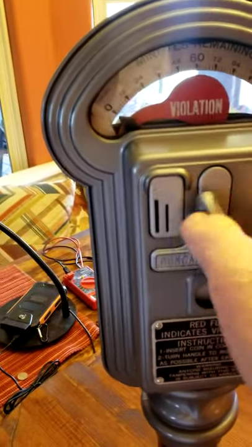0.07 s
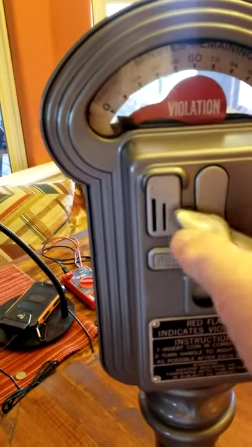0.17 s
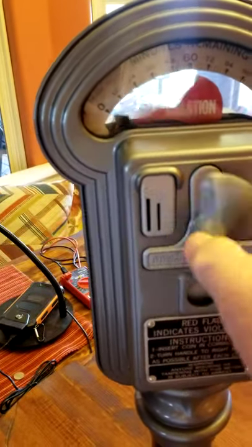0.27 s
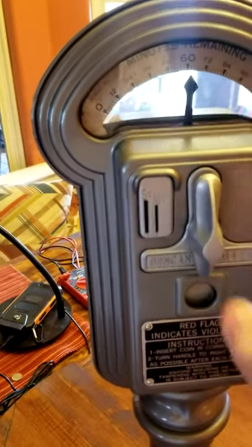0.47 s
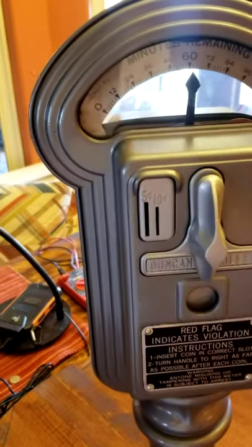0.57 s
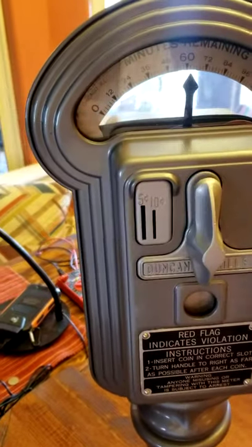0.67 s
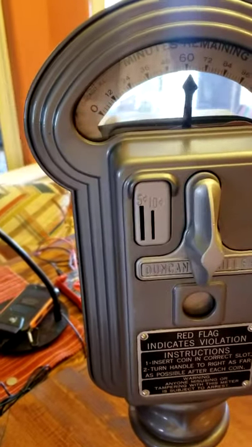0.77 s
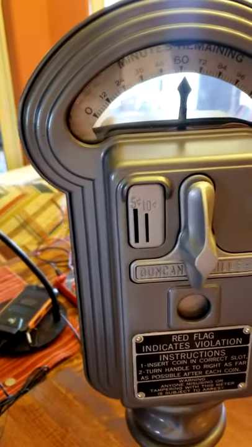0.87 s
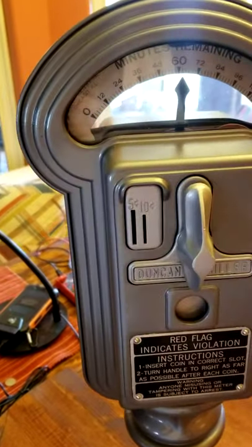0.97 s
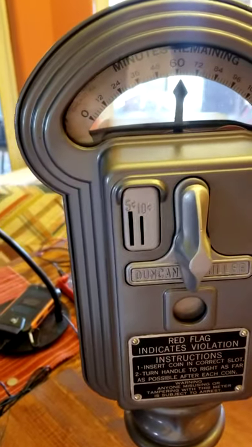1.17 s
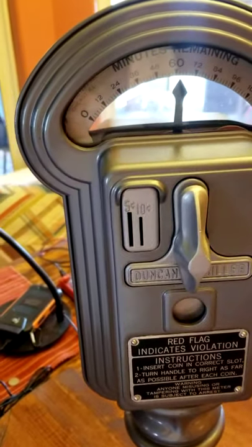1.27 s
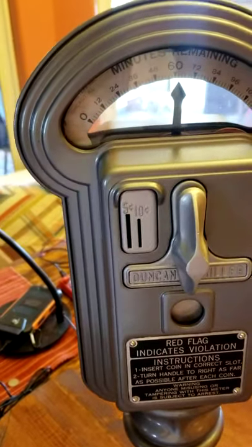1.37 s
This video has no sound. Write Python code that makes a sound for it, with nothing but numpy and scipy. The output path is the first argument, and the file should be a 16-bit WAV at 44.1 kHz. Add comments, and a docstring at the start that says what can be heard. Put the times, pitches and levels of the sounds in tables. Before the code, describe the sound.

A parking meter handle is released, whirring back and hitting its stop with a sharp clack.

```python
"""A ratchet's last faint ticks, then the handle of a metal parking meter is let go in a quiet room.
A catch snaps free, the spring whirls the gears back, and the handle slams on its stop and bounces.
The cast case rings, the stand shudders, the room answers; a few faint handling sounds follow.
Contacts are bursts of shaped noise; ringing parts are sums of decaying modes."""
import sys
import numpy as np
from scipy import signal
from scipy.fft import rfft, irfft, next_fast_len
from scipy.io import wavfile
from scipy.ndimage import map_coordinates

SR = 44100
rng = np.random.default_rng(int(sys.argv[2]) if len(sys.argv) > 2 else 0)


def int16_out(signal):
    """Quantize to a 16-bit WAV file."""
    q = np.round(np.clip(np.atleast_2d(signal).T, -1, 1) * 32767)
    wavfile.write(sys.argv[1], SR, q.astype(np.int16))


N = 61739
ATTACK_S = 0.00034

# left-right likeness of near, diffuse and background sound: freq_hz, correlation
NEAR_ALIKE = [(170, 0.98), (400, .6), (700, 0), (2000, .1), (6000, 0.51), (12000, 0.22)]
ROOM_ALIKE = [(170, 1), (400, .4), (900, 0), (12000, 0)]
FLOOR_ALIKE = [(120, .98), (400, .75), (1500, .3), (10000, .1)]


def amp(db):
    """Decibels to gain."""
    return 10 ** (np.asarray(db) / 20)


def unit(x):
    """Scale to rms 1."""
    return x / np.sqrt(np.mean(x ** 2) + 1e-20)


def along(points, hz):
    """Interpolate (freq_hz, value) points on a log axis."""
    freqs_hz, values = np.transpose(points)
    return np.interp(np.log(hz + 1), np.log(freqs_hz + 1), values)


def pan(db):
    """Stereo gains; positive is left."""
    return amp(np.array([[db], [-db]]) / 2)


def filtered(x, response):
    """Apply the gain response(hz)."""
    size = next_fast_len(N + SR // 2)
    return irfft(rfft(x, size) * response(np.fft.rfftfreq(size, 1 / SR)), size)[..., :N]


def noise(colour_db, alike):
    """Stereo noise, rms 1, of given spectrum and left-right likeness."""
    def mid_side_gains(hz):
        angle = np.arccos(np.clip(along(alike, hz), -1, 1)) / 2
        return amp(colour_db(hz)) * [np.cos(angle), np.sin(angle)]
    mid, side = filtered(rng.standard_normal((2, N)), mid_side_gains)
    return unit(np.array([mid + side, mid - side]))


def struck(start_s, rise_s, t60_s):
    """Envelope of a blow."""
    t = np.maximum(np.arange(N) / SR - start_s, 0)
    return (1 - np.exp(-t / rise_s)) * amp(-60 * np.minimum(t / t60_s, 10))


def wobble(knots_per_s):
    """Smooth random curve, 0.5 s long."""
    return map_coordinates(rng.standard_normal(400), [np.arange(SR // 2) * knots_per_s / SR], mode="wrap")


def ring(modes, start_s, rise_s, spread, drift_rad, delay_cycles=0):
    """Decaying modes with drifting phase; spread scales the left-right phase offset."""
    t = np.arange(SR // 2) / SR
    attack = 1 - np.exp(-t / rise_s)
    out = np.zeros((2, N + SR))
    for hz, db, t60_s in modes:
        scatter_db, lag = rng.standard_normal(2)
        phase = rng.uniform(0, 2 * np.pi) + drift_rad * wobble(knots_per_s=66)
        offset = np.array([[1], [-1]]) * lag * spread * min(hz / 1000, 1)
        envelope = attack * amp(db + scatter_db - 60 * t / t60_s)
        start = round((start_s + delay_cycles / hz) * SR)
        out[:, start:][:, :len(t)] += envelope * np.sin(2 * np.pi * hz * t + phase + offset)
    return out[:, :N]


def resonant(contacts, alike):
    """Brief contacts, each one resonant band of noise."""
    out = np.zeros((2, N))
    for start_s, db, centre_hz, halfwidth_oct, rise_s, t60_s in contacts:
        band_db = lambda hz: -20 * np.log10(1 + (np.log2((hz + 1) / centre_hz) / halfwidth_oct) ** 2)
        out += amp(db) * struck(start_s, rise_s, t60_s) * noise(band_db, alike)
    return out


def room_tone():
    """Low rumble, stronger on the right, and faint hiss."""
    # background spectrum: freq_hz, density_db
    colour = [(15, -36), (25, -6), (69, 0), (160, -11.5), (227, -9), (399, -14.5), (648, -31), (2420, -31),
              (3260, -35), (4260, -33), (6380, -30.5), (7700, -48), (9050, -44.5), (12200, -25.5),
              (15500, -27.5)]
    # background balance: freq_hz, pan_db
    balance = [(60, -10), (300, 2), (1000, 0.5), (12000, 0.5)]
    tone = amp(-66.5) * noise(lambda hz: along(colour, hz), FLOOR_ALIKE)
    return filtered(tone, lambda hz: amp(np.array([[.5], [-.5]]) * along(balance, hz)))


def windup():
    """The ratchet ticks its last; the rattle of winding dies away."""
    # rattle spectrum: freq_hz, density_db
    colour = [(100, -5), (620, -9.5), (870, -0.5), (1150, -9), (1550, 0.5), (3200, -8.5), (4500, -4),
              (6600, -6), (7800, -19.5), (11000, -11.5), (13200, -8), (15700, -17), (16500, -40)]
    # ratchet ticks: start_s, level_db
    clicks = [(.002, -51.5), (.032, -45), (.059, -50), (0.228, -60)]
    # ratchet modes: pitch_hz, level_db, t60_s
    modes = [(865, -5.5, 0.1), (1450, -4.5, .07), (1546, -0.5, 0.14), (1667, -1.5, 0.085), (2350, -4, .06),
             (4350, -1.5, .11), (5283, -10, .08), (6600, -10, .08)]
    decay_db_per_s = 146
    fade = amp(-43 - decay_db_per_s * np.arange(N) / SR)
    rattle = fade * noise(lambda hz: along(colour, hz), ROOM_ALIKE)
    ticks = sum(amp(db) * ring(modes, start_s, rise_s=.00056, spread=1, drift_rad=.27)
                for start_s, db in clicks)
    return pan(db=3.5) * (rattle + ticks)


def handling():
    """Faint knocks and rubs before and after the release."""
    # contacts: start_s, level_db, centre_hz, halfwidth_oct, rise_s, t60_s
    touches = [(.085, -61, 330, .4, .025, .6), (.196, -68, 4800, .5, .004, .2),
               (.996, -66, 2330, .04, .003, .21), (.997, -62, 290, .35, .012, .42),
               (.996, -73, 1150, .12, .003, .2), (1.232, -70, 700, .3, .008, .38),
               (1.272, -68, 1120, .1, .012, .2), (1.25, -75, 3500, .9, .025, .3)]
    return pan(db=-.5) * resonant(touches, FLOOR_ALIKE)


def gears():
    """Teeth tick past unevenly as the spring unwinds."""
    # run-back envelope: time_s, level_db
    run = [(.232, -67.5), (.243, -29), (.262, -28.5), (.28, -27.5), (.295, -31), (.32, -38), (.345, -36.5),
           (.37, -38.5), (.392, -40.5), (.41, -71)]
    # gear spectrum: freq_hz, density_db
    colour = [(60, -32), (130, -19), (200, -7), (660, -7), (830, 7.5), (960, -1), (1100, 3), (1300, -5),
              (2100, -0.5), (3800, -8.5), (6500, -7), (8800, -16.5), (10500, -9), (12700, -1.5),
              (14400, -9.5), (15300, -7), (15900, -30)]
    teeth, teeth_per_s, scatter_db = 200, 330, 3
    run_s, run_db = np.transpose(run)
    t = np.arange(N) / SR
    jitter, strength = rng.standard_normal((teeth, 2)).T
    tooth_s = run_s[0] + (np.arange(teeth) + .3 * jitter) / teeth_per_s
    ticks = np.bincount(np.clip(tooth_s * SR, 0, N - 1).astype(int), amp(scatter_db * strength), N)
    chatter = signal.fftconvolve(ticks, struck(0, ATTACK_S, t60_s=.025))[:N] * (t < run_s[-1])
    running = (t > run_s[0]) & (t < run_s[-1])
    chatter /= np.sqrt(np.mean(chatter[running] ** 2))
    envelope = amp(np.interp(t, run_s, run_db)) * chatter
    return pan(db=4) * envelope * noise(lambda hz: along(colour, hz), NEAR_ALIKE)


def catch():
    """Catch and pawl snap: bright cracks that ring the small steel parts."""
    # snaps: start_s, level_db, pan_db
    snaps = [(0.2385, -8, 5), (0.272, -15.5, 3.5), (.277, -19, 3.5), (.2995, -24.5, 7), (.3425, -28.5, 8.5),
             (.3518, -27, 2), (.357, -27, 3.5)]
    # snap spectrum: freq_hz, density_db
    colour = [(200, -37.5), (800, -21), (2900, -13), (3800, -16), (6200, -18.5), (7300, -6), (8600, -19.5),
              (10200, -7), (11400, -14.5), (12200, -2), (13700, 2.5), (14500, -9), (15300, -8.5),
              (16800, -22.5)]
    # steel modes: pitch_hz, level_db, t60_s
    modes = [(12130, 0, .2), (12630, -2, .19), (13750, -2, .17), (15275, -4, .18)]
    out = np.zeros((2, N))
    for start_s, db, pan_db in snaps:
        crack = noise(lambda hz: along(colour, hz), NEAR_ALIKE) * struck(start_s, ATTACK_S, t60_s=.02)
        steel = amp(-23) * ring(modes, start_s, rise_s=.001, spread=.65, drift_rad=1)
        out += amp(db) * (pan(pan_db) * crack + pan(db=3.6) * steel)
    return out


def stops():
    """Handle and levers hit their stops: a crack, a hollow knock, a quieter ring of the case."""
    # blows: start_s, level_db, tilt_db_per_oct, pan_db
    blows = [(0.2398, -24, -3.5, 7), (0.2669, -22.5, -0.5, 4), (0.3027, -20, -5.5, 3),
             (0.3374, -26, -6, 4.5), (.394, -4.5, -1, 2.5), (0.4077, -21.5, 1.5, 5),
             (0.4289, -14.5, -2.5, 0), (0.4665, -23, -4.5, 6), (.5005, -32.5, -5, 10),
             (1.131, -67, -1.5, 6)]
    # crack spectrum: freq_hz, density_db
    colour = [(60, -27.5), (200, -15.5), (600, -17.5), (770, -4.5), (1450, -4), (2000, -4.5), (2500, -5.5),
              (3250, -4), (3650, -14), (4000, -5.5), (5300, -8), (6300, -11.5), (7000, -9.5), (8000, -17.5),
              (10500, -7.5), (13500, -5), (14700, -11), (15600, -9), (16500, -25.5)]
    # case modes: pitch_hz, level_db, t60_s
    modes = [(178, -7, .25), (232, -13, .28), (322, -13, .35), (436, -7, .18), (730, -3, .12), (803, 1, .1),
             (904, -5, .43), (992, -8, .28), (1040, -1, .11), (1337, 0, .15), (1420, 0, .09),
             (1610, -1, .08), (1765, -2, .17), (2318, -1, .09), (3126, -6, .08), (3833, -7, .15),
             (3965, -2, .08), (4440, -5, .08), (4935, -4, .11), (5305, -5, .09), (10950, -9, .16)]
    knock_t60_s = .032  # damped by the contact
    damped = [(hz, db, knock_t60_s) for hz, db, _ in modes]
    out = np.zeros((2, N))
    for start_s, db, tilt_db_per_oct, pan_db in blows:
        tilted_db = lambda hz: along(colour, hz) + tilt_db_per_oct * np.log2(1 + hz / 1500)
        crack = noise(tilted_db, NEAR_ALIKE) * struck(start_s, ATTACK_S, t60_s=.021)
        # low modes arrive later
        knock = ring(damped, start_s, rise_s=.00057, spread=.79, drift_rad=1, delay_cycles=1.6)
        tail = ring(modes, start_s, rise_s=.003, spread=.8, drift_rad=1, delay_cycles=1.6)
        out += amp(db) * pan(pan_db) * (crack + amp(-16.5) * knock + amp(-25.5) * tail)
    return out


def levers():
    """Loose levers ping and knock in passing."""
    # pings: start_s, level_db, centre_hz, halfwidth_oct, rise_s, t60_s
    pings = [(.247, -31, 495, .08, .004, .13), (.283, -30, 850, .06, .004, .12),
             (.334, -27, 2230, .06, .003, .05), (.407, -24, 5000, .025, .003, .04)]
    return pan(db=5) * resonant(pings, NEAR_ALIKE)


def stand():
    """The meter shudders on its stand as the spring lets go and stops."""
    # jolts: start_s, level_db
    jolts = [(.251, -28), (.394, -36.5), (.552, -50.5)]
    # stand modes: pitch_hz, level_db, t60_s
    modes = [(47.7, -6.5, 0.49), (83, -1.5, 0.39), (96, -9.5, 0.44), (227.6, -7.5, 0.37), (322, -11.5, .3),
             (486.5, -1.5, .22)]
    return sum(amp(db) * ring(modes, start_s, rise_s=.014, spread=.13, drift_rad=.083)
               for start_s, db in jolts)


def reverb(x, decay, delay_s):
    """Diffuse tail, fed equally on both sides; decay sets t60 by frequency."""
    # tail spectrum: freq_hz, density_db
    colour = [(100, -8), (300, 1.5), (1000, -4), (5000, -1), (9000, 1.5), (13000, -6), (15500, -4.5),
              (16200, -28)]
    diffuse = noise(lambda hz: along(colour, hz), ROOM_ALIKE)
    hz, t, spectra = signal.stft(diffuse, SR, nperseg=256)
    tail = signal.istft(spectra * amp(-60 * t / along(decay, hz)[:, None]), SR, nperseg=256)[1]
    tail /= np.linalg.norm(tail[0])
    delayed = np.pad(tail, ((0, 0), (round(delay_s * SR), 0)))
    centred = np.sqrt(np.mean(x ** 2)) * np.array([unit(side) for side in x])
    return signal.fftconvolve(centred, delayed, axes=1)[:, :N]


def room(parts):
    """The near room answers each part; the far room rings longer and softer."""
    # near and far decay: freq_hz, t60_s
    near_decay = [(100, 0.36), (400, 0.26), (1000, .33), (5000, 0.29), (8000, 0.092), (14000, .22)]
    far_decay = [(100, 1), (1000, .62), (5000, 0.66), (9000, .55), (14000, 0.29)]
    near = sum(reverb(part, near_decay, delay_s=.007) for part in parts)
    far = reverb(sum(parts), far_decay, delay_s=.02)
    return amp(-8) * pan(db=1.5) * near + amp(-18.5) * pan(db=2) * far


def scene():
    """The mechanism and its reverb, with the quieter sounds, over room tone."""
    mechanism = [catch(), gears() + levers(), stops()]
    return sum(mechanism) + room(mechanism) + handling() + stand() + windup() + room_tone()


def record(dry):
    """Soft peak limit, then a brick-wall low-pass."""
    ceiling, cutoff_hz = .9, 16900
    rounded = dry / (1 + np.abs(dry / ceiling) ** 6) ** (1 / 6)
    return filtered(rounded, lambda hz: hz < cutoff_hz)


dry = scene()
out = record(dry)
int16_out(out)
```